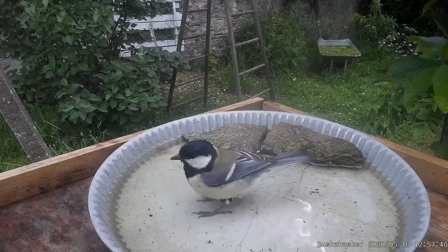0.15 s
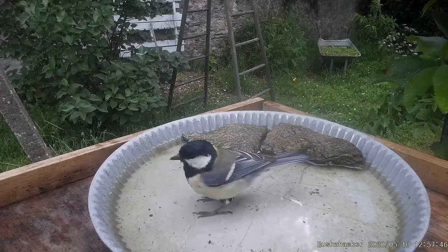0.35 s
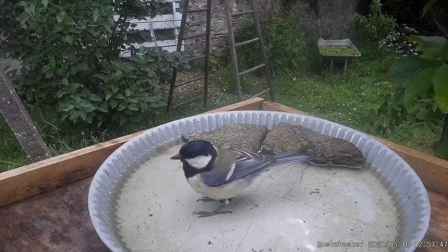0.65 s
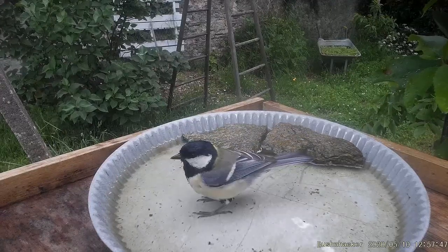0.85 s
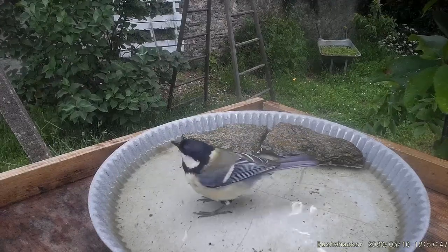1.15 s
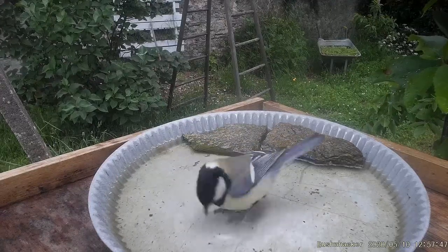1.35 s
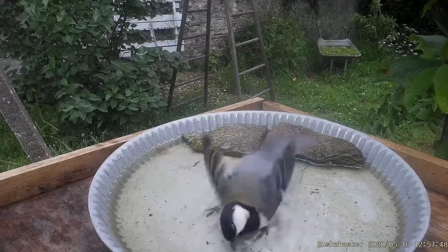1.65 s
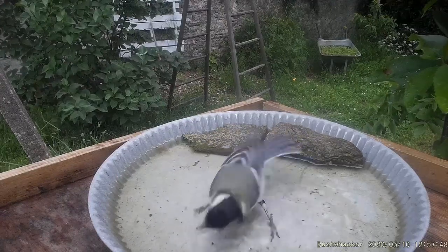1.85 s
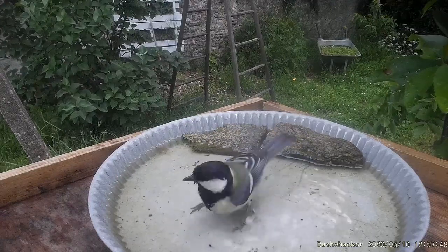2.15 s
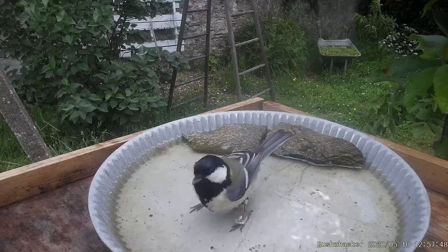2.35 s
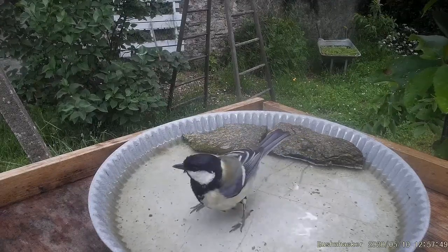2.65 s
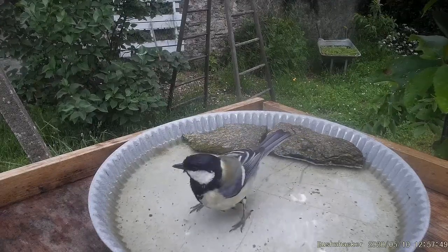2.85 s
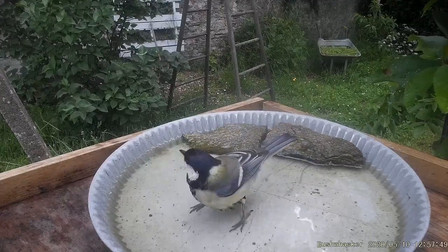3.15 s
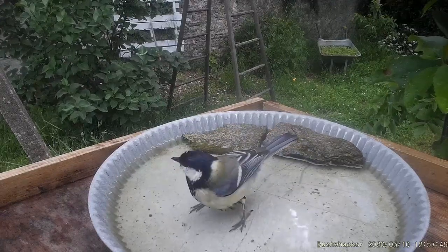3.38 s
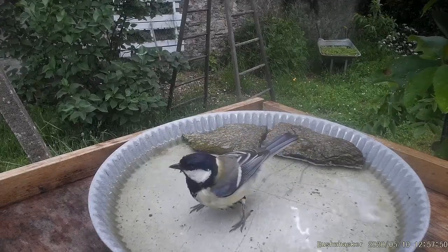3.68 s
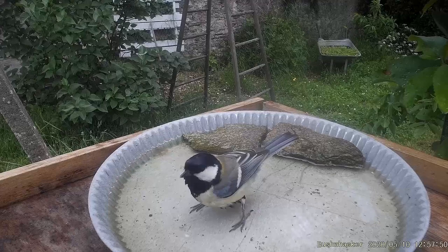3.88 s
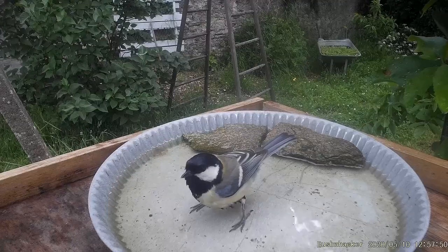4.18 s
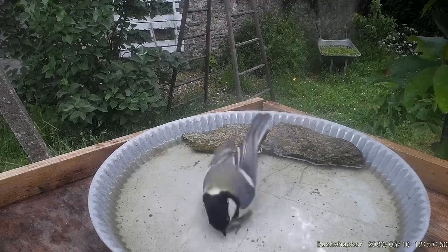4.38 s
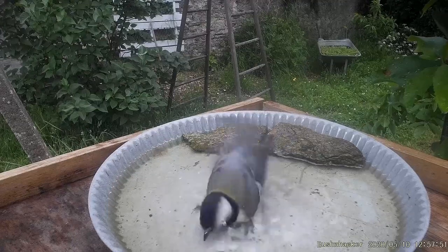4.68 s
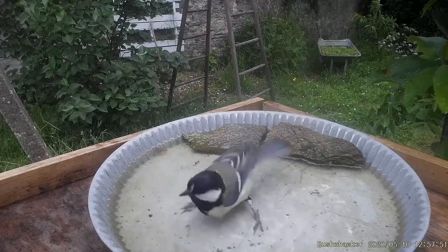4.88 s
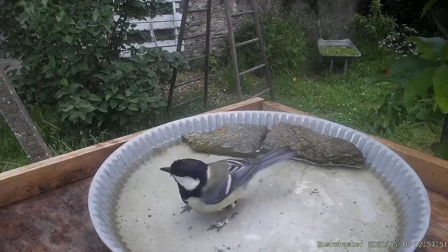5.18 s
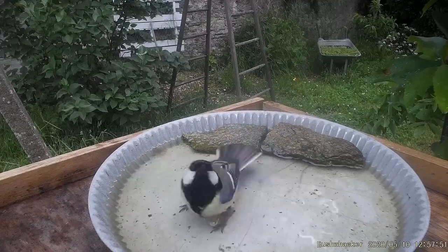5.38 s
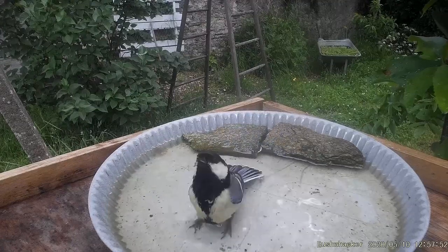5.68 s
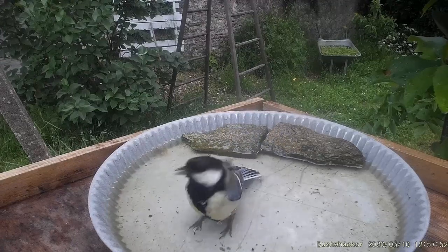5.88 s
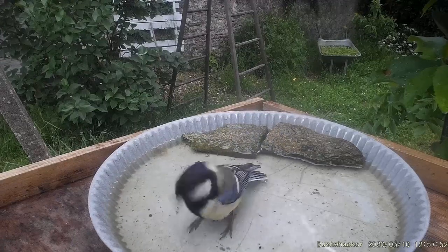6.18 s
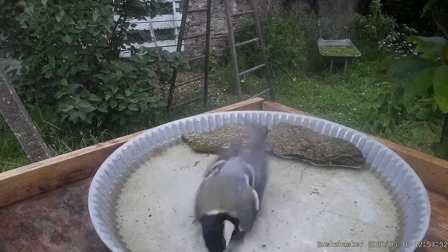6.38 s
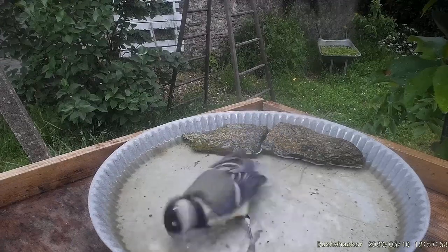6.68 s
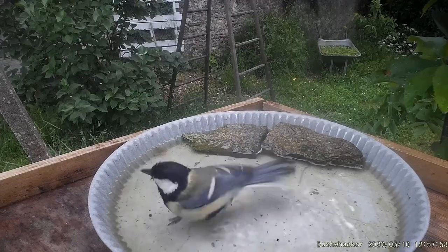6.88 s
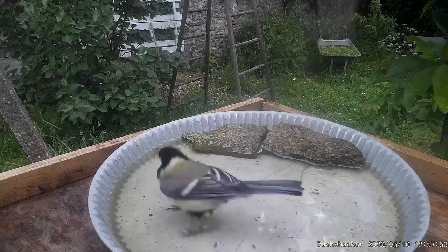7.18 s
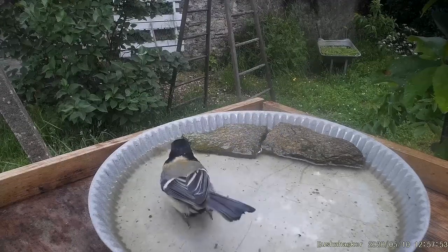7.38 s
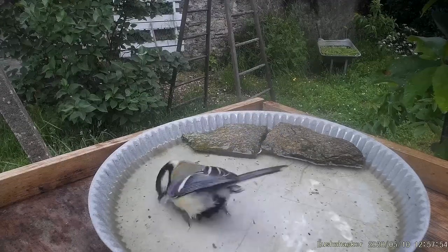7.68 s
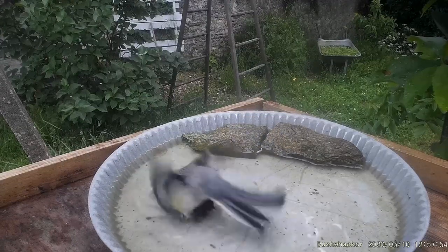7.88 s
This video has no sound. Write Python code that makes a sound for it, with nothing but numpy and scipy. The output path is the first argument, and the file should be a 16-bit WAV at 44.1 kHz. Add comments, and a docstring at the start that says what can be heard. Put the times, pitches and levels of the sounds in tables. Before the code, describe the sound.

A bird bathing in shallow water, recorded close outdoors. Metallic claw ticks come first, then little water slaps with hissing wing spray and small bubbling drips. A cluster of scratchy metal knocks comes midway, followed by splashing and a hard bright click with a slap. Pauses are filled by distant chirps, thin whistles, low coos and faint nasal fowl calls, with soft air hiss and a barely audible whine.

```python
"""A small bird bathes in a shallow metal dish, close to a microphone in a garden.
An early drop ticks and claws knock the dish: rough contacts ring its modes, and a rub scrapes them. From then
on far sparrows chirp, a dove coos and a fowl calls: wavering tones, the high ones echoed. From 1.3 s slaps throw
noise bursts and hissing spray; claws return at 3.4 s, both mix near 5 s, slaps and flutters fill the last 2 s.
Throughout, drops tick over rising bubble tones, with shaped-noise hiss and light wind, and a thin steady whine."""
import sys
import numpy as np
from scipy import signal
from scipy.fft import rfft, irfft, next_fast_len
from scipy.io import wavfile
from scipy.ndimage import uniform_filter1d

SR = 44100
rng = np.random.default_rng(int(sys.argv[2]) if len(sys.argv) > 2 else 0)


def log_audio(samples):
    """Write samples as a 16-bit WAV file to the path given in sys.argv[1]."""
    # one column per channel
    frames = np.atleast_2d(samples).T
    # limit to full scale, then quantise
    limited = np.clip(frames, -1, 1)
    pcm = np.round(limited * 32767).astype(np.int16)
    wavfile.write(sys.argv[1], SR, pcm)


def gain_from_db(level_db):
    """Convert decibel levels to linear amplitude factors (20 dB per decade)."""
    decades = np.asarray(level_db, float) / 20
    return 10 ** decades


N = 354563


def evened(x):
    """Scales x to rms 1."""
    return x / np.sqrt(np.mean(x ** 2) + 1e-20)


def read(points, hz):
    """Reads a curve of (frequency [Hz], level [dB]) on a logarithmic frequency axis."""
    f, value = np.transpose(points)
    return np.interp(np.log(hz + 1), np.log(f + 1), value)


def add(mix, s, sound):
    """Adds a sound to the mix from s seconds on, cut at the end of the mix."""
    part = mix[max(round(s * SR), 0):][:len(sound)]
    part += sound[:len(part)]


def coloured(x, points):
    """Filters x by the curve of the points and scales it to rms 1."""
    size = next_fast_len(len(x))
    gain = gain_from_db(read(points, np.fft.rfftfreq(size, 1 / SR)))
    return evened(irfft(rfft(x, size) * gain, size)[:len(x)])


def resonate(x, hz, width):
    """A fixed resonance of gain 1 at its peak."""
    return signal.lfilter(*signal.iirpeak(hz, hz / max(width, 5), SR), x)


def ring(hz, hold, rise):
    """A mode damped by water: it swells over the push, holds, and is stopped."""
    t = np.arange(int(SR / 4)) / SR
    return np.exp(-(t / hold) ** 1.3) * (1 - np.exp(-t / rise)) * np.sin(2 * np.pi * hz * t)


def grains(per_s, spread_db, length_s):
    """Noise broken into clumps of uneven size."""
    sizes = gain_from_db(spread_db * np.minimum(rng.exponential(1, N), 4)) * (rng.random(N) < per_s / SR)
    clumps = signal.oaconvolve(sizes, np.exp(-np.arange(600) / (length_s * SR)))[:N]
    return evened(clumps * rng.standard_normal(N))


def stretches(rows):
    """Gain over time: each stretch sets in, slides from its start level to its end level, and dies away."""
    attack_s, release_t60 = 0.008, 0.097
    out, t = np.zeros(N), np.arange(N) / SR
    for start, end, db, end_db in rows:
        level_db = np.interp(t, (start, end), (db, end_db))
        level_db -= 60 * np.maximum(t - end, 0) / release_t60
        out = np.hypot(out, gain_from_db(level_db) * np.clip((t - start) / attack_s, 0, 1))
    return out


def after(blows, share_db, t60):
    """Gain over time: each blow leaves a dying trail in proportion to its strength."""
    rise_s = 0.0062
    power, t = np.zeros(N), np.arange(SR // 2) / SR
    for s, db, *_ in blows:
        trail = gain_from_db(2 * (db + share_db - 60 * t / t60))
        add(power, s, trail * (1 - np.exp(-t / rise_s)) ** 2)
    return np.sqrt(power)


def echoes(x, t60):
    """Sparse taps of random sign that die away."""
    t = np.arange(SR // 2) / SR
    tail = rng.choice([-1., 1.], len(t)) * (rng.random(len(t)) < .05) * gain_from_db(-60 * t / t60)
    return signal.oaconvolve(x, tail / np.linalg.norm(tail))[:N]


# upper modes of the dish: (frequency [Hz], width [Hz], relative level [dB])
DISH_MODES = [(1788, 230, -6.5), (2290, 270, -13.5), (2450, 49, -5), (3060, 210, -7.5), (3466, 92, 3.5),
              (4300, 270, 0), (4764, 730, 0), (5640, 144, -4), (5870, 260, -6.5), (7130, 610, -1.5),
              (8220, 300, -5.5)]


def metal(x, spot_db):
    """The upper modes of the dish as the struck spot favours them, in alternating sign."""
    out = np.zeros(len(x))
    for k, (hz, width, db) in enumerate(DISH_MODES):
        out += (-1) ** k * gain_from_db(db + spot_db[k]) * resonate(x, hz, width)
    return out


LOWEST_HZ, LOWEST_HOLD_S = 704, 0.021  # lowest ring of the dish

# claws on bare metal: (time [s], peak level [dB], lowest ring before its swell [dB],
# brightness above 1 kHz [dB per octave], contact [s])
KNOCKS = [(0.3735, -35.5, -53, -3, 0.0074), (0.385, -22.5, -44, -5.5, 0.0025),
          (0.4214, -16.5, -20, -10, 0.0049), (0.4354, -20.5, -37, 13, 0.0054),
          (0.4444, -22, -24, -13.5, 0.0062), (0.4614, -29, -58, 0, 0.0054), (0.4814, -34, -79, 2, 0.0019),
          (0.5244, -44, -77, -7, 0.0036), (3.338, -54, -54, -12, 0.0044), (3.3947, -41.5, -64, -6, 0.0042),
          (3.4092, -31, -48, -7, 0.0038), (3.4244, -34, -39, 0.1, 0.0032), (3.455, -30, -55, -6, 0.0051),
          (3.4744, -21, -48, -8, 0.0011), (3.4805, -27.5, -30.5, -9, 0.0092),
          (3.5004, -16, -31, -3.5, 0.0077), (3.5144, -25.5, -26, -8, 0.0039),
          (3.5224, -25, -20, -11.5, 0.0021), (3.546, -17.5, -34, -6.5, 0.013),
          (3.5535, -12.5, -28, -5, 0.0032), (3.5644, -16.5, -23.5, -3, 0.0032),
          (3.5804, -30, -63, -28, 0.0027), (3.6117, -45, -45, -9, 0.0034), (3.6541, -43, -50, -22, 0.0061),
          (3.696, -48, -57, -30, 0.0019), (3.7589, -48, -47.5, -1, 0.0024),
          (4.0392, -36, -44.5, -5, 0.00082), (4.0652, -29.5, -42.5, -9, 0.0042),
          (4.0844, -37, -40.5, -11.5, 0.014), (4.1305, -41, -41.5, -27, 0.0027),
          (4.9018, -63, -74, -43, 0.0048), (4.9197, -35, -43, 13, 0.004),
          (4.9377, -33.5, -36, -0.5, 0.0018), (4.9544, -30, -22, 8, 0.0041),
          (4.9631, -10, -49, 5.5, 0.0025), (4.9794, -43, -19.5, -42, 0.003)]


def knocks():
    """Short rough contacts ring the upper modes; their push swells the lowest ring."""
    spot_spread_db = 3  # how much the struck spot changes each mode
    out, t = np.zeros(N), np.arange(3000) / SR
    for s, db, low_db, bright, contact in KNOCKS:
        noise = rng.standard_normal(len(t))
        u = t / max(contact, .0003)
        push = (1 - np.exp(-u / 0.12)) * np.exp(-u)
        tilt = [(1000, 0), (16000, np.log2(16000 / 1000) * bright)]
        blow = coloured(noise * push, tilt)
        spot_db = spot_spread_db * noise[::-1]  # the last noise values serve as random spot gains
        blow = metal(blow * np.exp(-t / .074), spot_db)
        add(out, s, gain_from_db(db) * blow / abs(blow).max())
        add(out, s, gain_from_db(low_db) * ring(LOWEST_HZ, LOWEST_HOLD_S, rise=0.012))
    return out


# claws dragging over the metal: (start [s], end [s], start level [dB], end level [dB])
DRAGS = [(0.5, 0.62, -71, -65.5), (3.42, 3.53, -45.5, -42.5), (3.59, 3.8, -46, -66),
         (4.89, 4.945, -52, -39)]


def scrapes():
    """Clumped rubbing noise rings the dish during drags and as every knock skids on."""
    rub = coloured(grains(per_s=350, spread_db=6.5, length_s=0.0064), [(1000, 16), (16000, -26)])
    upper = evened(metal(rub, np.zeros(len(DISH_MODES))))
    lowest = evened(resonate(rub, LOWEST_HZ, 38))
    skids = after(KNOCKS, share_db=-23.5, t60=0.13)
    return np.hypot(stretches(DRAGS), skids) * (upper + gain_from_db(-7.5) * lowest)


# feet and wings slapping the water, and two single drops that ring longer at 4.533 s and 7.9009 s: # (time [s],
# peak level [dB], body pitch [Hz], wet-floor ring before its swell [dB], # lowest ring before its swell [dB],
# body t60 [s])
SLAPS = [(1.3212, -29.5, 1290, -50, -33, 0.094), (1.3404, -31, 3350, -47, -31.5, 0.041),
         (1.3502, -35, 1320, -78, -79.5, 0.014), (1.3924, -31, 2330, -52, -84, 0.036),
         (1.4296, -42, 2540, -61, -71, 0.073), (1.4521, -26.5, 1150, -43, -34.5, 0.1),
         (1.6968, -34, 2300, -57, -45, 0.033), (2.1514, -43, 2750, -100, -93, 0.063),
         (2.158, -25.5, 2490, -62, -66, 0.086), (2.1764, -25, 4940, -76, -44, 0.021),
         (4.5094, -36, 3450, -68, -51, 0.0047), (4.533, -29.5, 3280, -77, -68, 0.013),
         (4.795, -36, 3460, -55, -44, 0.1), (5.1451, -22.5, 2470, -45, -67, 0.0072),
         (5.1632, -13.5, 2250, -40.5, -28, 0.023), (5.1709, -18.5, 1150, -61, -68, 0.027),
         (5.1924, -33.5, 2170, -49, -38, 0.034), (5.7041, -34.5, 1450, -61, -51, 0.016),
         (6.2917, -46, 1860, -62, -58, 0.02), (6.3658, -33.5, 2730, -41, -48, 0.074),
         (6.4384, -30, 2293, -31.5, -34.5, 0.076), (6.5109, -27, 2390, -30.5, -32.5, 0.071),
         (6.9656, -37.5, 3200, -59, -67, 0.074), (6.9819, -38.5, 1315, -51, -62, 0.043),
         (7.3022, -35, 985, -56, -47.5, 0.0053), (7.7719, -36.5, 3220, -48.5, -46, 0.022),
         (7.83, -32, 2725, -48, -46.5, 0.047), (7.9009, -34, 4550, -71, -68, 0.043),
         (7.9249, -39, 6360, -73, -61, 0.036), (7.974, -44, 2100, -72, -71, 0.04),
         (7.9859, -29.5, 2070, -41.5, -38, 0.037)]
# dish floor under water: (frequency [Hz], relative level [dB], hold [s])
WET_FLOOR = [(438.5, -1, 0.014), (1150, -10.5, 0.012)]
# spectrum of thrown water: (frequency [Hz], relative level [dB per Hz])
SPLASH_SPECTRUM = [(120, -32), (200, -3), (439, -2), (610, -5.5), (693, 5.5), (879, -12), (2450, -1.5),
                   (4160, -6), (7600, -7), (13400, 1), (15800, -2)]


def wet_floor(shifts):
    """The dish floor rings under water, its pitch shifting a little with the water depth."""
    spread = 0.02  # share of each pitch
    floor = 0
    for shift, (hz, db, hold) in zip(shifts, WET_FLOOR):
        floor = floor + gain_from_db(db) * ring(hz * (1 + spread * shift), hold, rise=0.0029)
    return floor


def slaps():
    """A crack of fizz that mostly dies first, a rough body with a sinking tone, and the dish floor answering."""
    out, t = np.zeros(N), np.arange(4000) / SR
    for s, db, hz, floor_db, low_db, t60 in SLAPS:
        a, b, c = rng.standard_normal((3, len(t)))
        fall = gain_from_db(-60 * t / max(t60, .004))
        fizz = coloured(a, SPLASH_SPECTRUM) * (np.exp(-t / 0.0038) + 0.096 * np.sqrt(hz / 2000) * fall)
        rough = evened(resonate(resonate(b, hz, .36 * hz), hz, .6 * hz))
        sinking = np.sin(2 * np.pi * hz * t * (1 - 1.5 * t))
        body = (.75 * rough + .9 * sinking) * fall
        lower = evened(resonate(resonate(c, 0.6 * hz, 0.4 * hz), 0.45 * hz, 0.4 * hz))
        lower *= fall ** 0.7 * (1 - np.exp(-t / .003))
        slap = body + 0.64 * fizz + 0.21 * lower
        add(out, s, gain_from_db(db) * slap / abs(slap).max())
        lowest = ring(LOWEST_HZ, LOWEST_HOLD_S, rise=0.017)
        add(out, s, gain_from_db(floor_db) * wet_floor(shifts=a) + gain_from_db(low_db) * lowest)
    return out


def faint_drips():
    """Faint drips at random moments, as rows with the columns of DROPS."""
    count, middle_db, low_hz, high_hz = 20, -59, 3000, 8500
    when, size, pitch, dryness = rng.random((count, 4)).T
    db = middle_db + 6 * (size - .5)
    return np.transpose([when * N / SR, db, low_hz * (high_hz / low_hz) ** pitch, db - 12 * dryness])


# single drops, and the bright 8 kHz click of the hard claw knock at 4.96 s:
# (time [s], bubble level [dB], bubble pitch [Hz], tick peak level [dB])
DROPS = [(0.2008, -62, 2520, -45), (1.2274, -71, 1500, -53), (1.294, -67, 2520, -46),
         (1.4116, -50, 3450, -34.5), (1.4424, -60, 1520, -43), (1.6634, -39, 6740, -49.5),
         (1.724, -42, 3940, -47.5), (1.8276, -47, 3740, -50), (1.8516, -51, 3700, -46),
         (1.9709, -53, 7740, -54), (2.1016, -50, 8600, -53.5), (2.3022, -52, 3470, -44),
         (2.3324, -48, 3960, -53), (2.389, -50, 4300, -48), (2.504, -55, 2480, -48),
         (2.5444, -58, 3060, -46), (2.558, -61, 5200, -43), (2.6416, -57, 3350, -34.5),
         (3.2576, -52.5, 2110, -42), (3.667, -45.5, 6700, -55), (3.836, -66, 3150, -38.5),
         (4.3024, -54, 3340, -46), (4.4096, -67, 3320, -43.5), (4.6139, -30.5, 6000, -32),
         (4.6353, -35, 7600, -28.5), (4.7187, -45, 8400, -55), (4.7401, -46, 7400, -27.5),
         (4.796, -35, 3730, -29), (4.8647, -41, 8400, -37), (4.9645, -16.5, 8150, -17),
         (5.1319, -23, 2450, -26), (5.3755, -53, 7070, -35.5), (5.4126, -57, 2630, -45),
         (5.693, -69, 1570, -48), (5.7902, -48, 3330, -39), (6.2767, -51, 8160, -38),
         (6.4173, -60, 2380, -64), (6.49, -57, 2380, -33), (6.567, -40, 7000, -32.5),
         (6.6026, -49, 2370, -55), (6.6248, -47, 7800, -31), (6.6732, -42, 6400, -58),
         (6.688, -48, 3030, -38), (6.7003, -46, 8700, -35), (6.79, -52, 2300, -48),
         (6.8583, -77, 4500, -40.5), (6.9541, -38, 8200, -25), (7.0604, -56, 7700, -40),
         (7.1285, -54, 5650, -58), (7.3272, -35.5, 6860, -33), (7.4568, -59, 3130, -43),
         (7.7207, -51, 7000, -44), (7.9518, -48, 7860, -38), (8.0207, -44, 7700, -36)]


def drops():
    """A sharp tick coloured round the bubble, which rises in pitch as it rings out; one claw click likewise."""
    out, t = np.zeros(N), np.arange(3000) / SR
    for s, db, hz, tick_db in np.vstack([DROPS, faint_drips()]):
        bubble_t60 = 0.018 * (5000 / hz) ** 0.61  # bigger, lower bubbles ring longer
        bubble = np.sin(2 * np.pi * hz * t * (1 + 1.8 * t)) * gain_from_db(-60 * t / bubble_t60)
        colour = [(0.077 * hz, -24), (1.28 * hz, 0), (1.9 * hz, 0), (4 * hz, -18)]
        tick = coloured(rng.standard_normal(len(t)), colour)
        tick *= (1 - np.exp(-t / 0.000063)) * np.exp(-t / 0.0011)
        add(out, s, gain_from_db(db) * bubble + gain_from_db(tick_db) * tick / abs(tick).max())
    return out


# wings shaking in the water: (start [s], end [s], start level [dB], end level [dB])
FLUTTERS = [(0.43, 0.6, -44, -72), (1.31, 1.5, -59, -64), (1.5, 1.66, -64, -61.5), (1.66, 1.93, -51, -55),
            (3.43, 3.62, -49.5, -54), (3.62, 3.86, -57.5, -67), (4.04, 4.18, -55, -58.5),
            (4.45, 4.51, -62, -53), (4.51, 4.88, -53, -52), (4.89, 5.13, -70, -44.5), (5.17, 5.3, -47, -69),
            (6.3, 6.39, -74, -52.5), (6.39, 6.6, -47.5, -46.5), (6.6, 6.82, -49, -60),
            (6.95, 7.02, -55, -70), (7.79, 8.04, -66.5, -42)]
# mist off the wings: (frequency [Hz], relative level [dB per Hz])
MIST_SPECTRUM = [(120, -45), (200, -3), (600, -2), (900, -6), (2000, -5.5), (3660, -3), (5780, -6.5),
                 (7600, -2), (9500, -6.5), (13000, 2), (15800, -14)]


def spray():
    """Fine drops merge into a hiss whose bands throb unevenly; wings and every blow throw it up."""
    out, beat = np.zeros(N), evened(uniform_filter1d(rng.standard_normal(N), 900))
    for hz in (500, 1000, 2000, 3500, 5500, 8000, 12000):
        own_beat = evened(uniform_filter1d(rng.standard_normal(N), 500))
        hiss = gain_from_db(2.8 * beat + 5.0 * own_beat) * rng.standard_normal(N)
        ticks = grains(per_s=60, spread_db=4, length_s=0.00067)
        out += resonate(hiss + 0.36 * ticks, hz, .5 * hz)
    mist = stretches(FLUTTERS) * coloured(out, MIST_SPECTRUM)
    splashes = after([*KNOCKS, *SLAPS], share_db=-12, t60=0.029)
    return mist + splashes * coloured(out, SPLASH_SPECTRUM)


# wing-pushed air on the microphone: (time [s], peak level [dB], pitch [Hz])
PUFFS = [(5.088, -35.5, 38.6), (5.129, -46, 56.6)]


def puffs():
    """Each puff of air is one low pressure pulse with a swing to either side."""
    out, t = np.zeros(N), np.arange(N) / SR
    for s, db, hz in PUFFS:
        u = np.pi * hz * (t - s)
        out -= gain_from_db(db) * (1 - 2 * u ** 2) * np.exp(-u ** 2)
    return out


def tone(length, hz, waver):
    """Phase of a voice that wavers a little about its pitch curve."""
    drift = evened(uniform_filter1d(rng.standard_normal(length), 300))
    return 2 * np.pi * np.cumsum(hz * (1 + waver * drift)) / SR


# course of one chirp: (time [s], pitch [Hz], relative level [dB])
CHIRP = [(0, 4600, -8), (.008, 4600, -2), (.026, 4550, -4), (.045, 3450, 0), (.055, 3900, -10),
         (.065, 3750, -2), (.08, 3400, -1), (.1, 2900, -6), (.12, 3000, -16)]
# far sparrows: (time [s], level before scatter and echoes [dB])
CHIRPS = [(.462, -56), (1.172, -62), (1.79, -60), (2.605, -61), (3.125, -62), (3.788, -62), (4.43, -63),
          (5.74, -63), (7.355, -62)]


def chirps():
    """Sparrow chirps: a wavering tone follows the same pitch and level course each time."""
    out = np.zeros(N)
    s, hz, db = np.transpose(CHIRP)
    t = np.arange(0, s[-1], 1 / SR)
    for start, level_db in CHIRPS:
        voice = np.sin(tone(len(t), np.interp(t, s, hz), 0.025))
        add(out, start, gain_from_db(level_db + np.interp(t, s, db)) * voice)
    return out


# thin whistles: (start [s], end [s], start pitch [Hz], end pitch [Hz], level before scatter and echoes [dB])
WHISTLES = [(.0, .1, 5300, 5300, -72), (.67, .715, 3650, 4200, -67), (2.5, 2.8, 7900, 7100, -74),
            (2.92, 2.95, 3300, 3400, -68), (3.72, 3.78, 3200, 3200, -68), (3.9, 4.0, 3350, 3250, -69),
            (3.95, 4.04, 4400, 5200, -67), (4.2, 4.26, 5500, 5500, -70), (4.42, 4.5, 3200, 3250, -66),
            (4.54, 4.68, 3250, 3250, -58), (5.01, 5.045, 2350, 2550, -58), (6.23, 6.26, 4300, 4700, -66),
            (7.33, 7.42, 7500, 7400, -73), (7.7, 8.04, 9300, 7950, -68), (4.3, 4.4, 6500, 6000, -72),
            (5.85, 6.1, 7800, 7200, -75)]


def whistles():
    """Thin far whistles: wavering tones that glide straight from pitch to pitch."""
    out = np.zeros(N)
    for start, end, hz, end_hz, db in WHISTLES:
        n = int((end - start) * SR)
        voice = np.sin(tone(n, np.linspace(hz, end_hz, n), 0.009))
        add(out, start, gain_from_db(db) * signal.windows.tukey(n, .25) * voice)
    return out


# far dove: (start [s], end [s], pitch [Hz], peak level [dB])
COOS = [(.68, 0.835, 502, -67.5), (2.9, 3.05, 490, -81), (4.1, 4.4, 502, -71), (5.8, 5.962, 500, -67),
        (6.1, 6.297, 498, -75), (7.4, 7.57, 499, -67)]


def coos():
    """Dove coos: soft wavering tones that swell and fade."""
    out = np.zeros(N)
    for start, end, hz, db in COOS:
        n = int((end - start) * SR)
        add(out, start, gain_from_db(db) * np.hanning(n) * np.sin(tone(n, hz, 0.0075)))
    return out


# far fowl: (start [s], end [s], level [dB])
FOWL_CALLS = [(0.7, .82, -87), (2.601, 2.81, -78), (3.205, 3.367, -92), (5.426, 5.643, -76.5),
              (7.445, 7.647, -75.5)]
# its harmonics: (multiple of the pitch, relative level [dB])
FOWL_VOICE = [(1, 2), (2, 0), (3, -3.5), (5, -4)]


def fowl():
    """Nasal calls: harmonics of one almost steady pitch, strongest at the first."""
    pitch_hz = 677
    out = np.zeros(N)
    for start, end, db in FOWL_CALLS:
        n = int((end - start) * SR)
        phase = tone(n, pitch_hz, 0.0007)
        voice = sum(gain_from_db(d) * np.sin(k * phase) for k, d in FOWL_VOICE)
        add(out, start, gain_from_db(db) * signal.windows.tukey(n, .4) * voice)
    return out


def far_birds():
    """High notes scattered by leaves and smeared by garden echoes, with the low voices plain."""
    high = chirps() + whistles()
    low = coos() + fowl()
    high *= gain_from_db(2.5 * evened(uniform_filter1d(rng.standard_normal(N), 250)))
    return gain_from_db(-6) * high + gain_from_db(1) * echoes(high, t60=.27) + low


# garden hiss: (frequency [Hz], relative level [dB per Hz])
AIR_SPECTRUM = [(150, -11), (250, 0.5), (406, -16), (475, 2.5), (555, -2.5), (684, 2.5), (813, -3),
                (1090, -3), (3200, -2), (7240, -2.5), (10200, -9), (14000, -9), (15800, -15)]


def air():
    """Garden hiss: noise shaped in short frames, with patches that drift in time and frequency."""
    level_db, patch_db = -65.5, 0.9  # rms of the hiss, rms depth of its patches
    a, b, patches = rng.standard_normal((N // 256 + 5, 513, 3)).T
    patches = evened(uniform_filter1d(uniform_filter1d(patches, 30, 0), 30, 1))
    shape_db = read(AIR_SPECTRUM, np.fft.rfftfreq(1024, 1 / SR))[:, None]
    z = (a + 1j * b) * gain_from_db(shape_db + patch_db * patches)
    return gain_from_db(level_db) * evened(signal.istft(z, nperseg=1024, noverlap=768)[1][:N])


# draughts, most of them from the moving bird: (time [s], peak level [dB], swell and fade [dB per s])
GUSTS = [(0.42, -56, 100), (1.4, -72, 42), (1.77, -63.5, 30), (2.17, -69, 60), (3.11, -66, 52),
         (3.519, -45, 197), (3.6, -61, 47), (4.07, -59.5, 97), (4.8, -65, 19), (5.03, -60.5, 29),
         (5.15, -52, 178), (5.82, -67.5, 35), (6.6, -61.5, 29), (6.99, -74, 49), (7.35, -67.5, 42),
         (7.92, -62, 29)]
# wind on the microphone: (frequency [Hz], relative level [dB per Hz])
RUMBLE_SPECTRUM = [(8.8, -41), (15, 3), (38, -4.5), (107, -8.5), (258, -14), (292, -16), (400, -14),
                   (520, -18), (880, -120)]


def wind():
    """Low rumble on the microphone: a steady light wind, and draughts that swell and fade."""
    t, steady_db = np.arange(N) / SR, -69.5
    power = gain_from_db(steady_db) ** 2
    for s, db, fade in GUSTS:
        power = power + gain_from_db(db - fade * abs(t - s)) ** 2
    return np.sqrt(power) * coloured(rng.standard_normal(N), RUMBLE_SPECTRUM)


def whine():
    """A thin steady sine from electronics."""
    hz, db = 13598, -85
    return gain_from_db(db) * np.sin(2 * np.pi * hz * np.arange(N) / SR)


# the microphone opening dulls near treble: (frequency [Hz], relative level [dB])
MOUTH = [(8500, 4.5), (10000, -2), (12500, -12), (16000, -20)]


def scene():
    """Near sounds, dulled at equal rms, get a short tail from the frame round the dish; the garden lies behind."""
    near = knocks() + scrapes() + slaps() + drops() + spray()
    near = np.std(near) * coloured(near, MOUTH)
    tail = gain_from_db(-11.5) * echoes(near, t60=0.098)
    return (near + tail + puffs() + far_birds() + air() + wind() + whine())[None]


def low_pass(x):
    """Removes everything above the highest recorded frequency."""
    return signal.sosfilt(signal.butter(12, 16430, fs=SR, output="sos"), x)


def record(dry):
    """Passes on the finished mix at the microphone."""
    return low_pass(dry)


dry = scene()
out = record(dry)
log_audio(out)
```